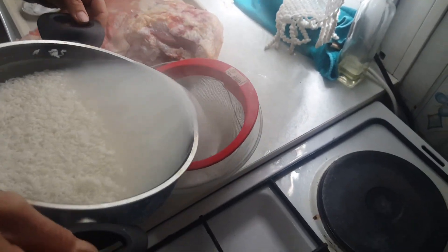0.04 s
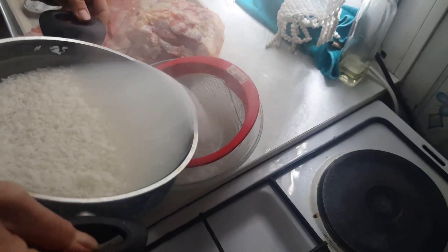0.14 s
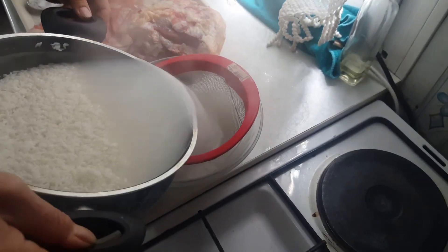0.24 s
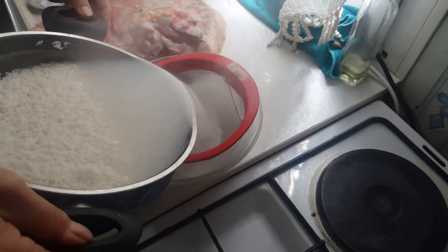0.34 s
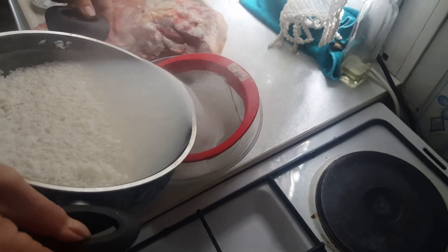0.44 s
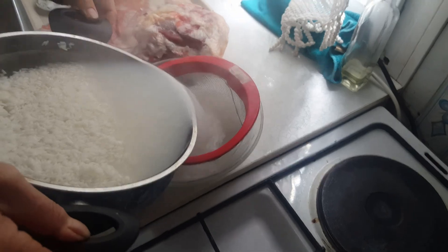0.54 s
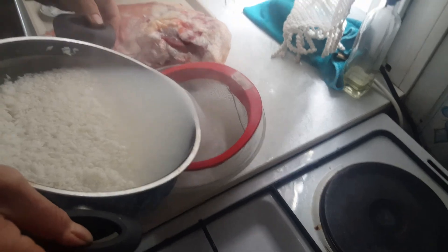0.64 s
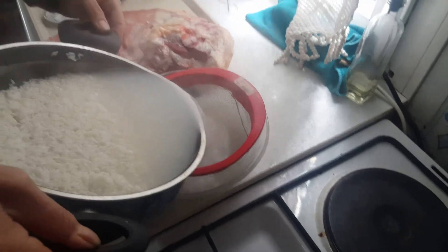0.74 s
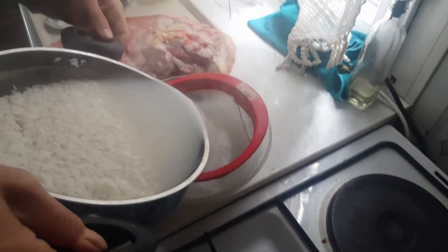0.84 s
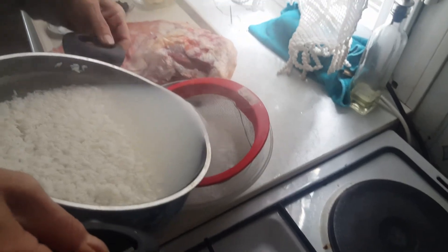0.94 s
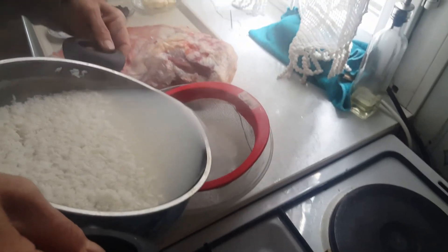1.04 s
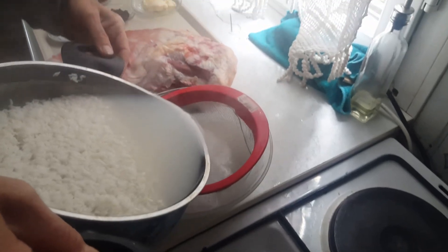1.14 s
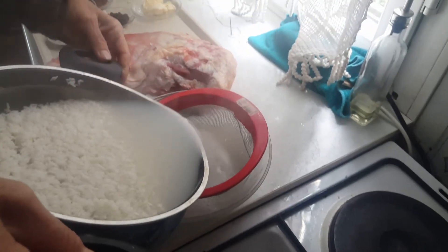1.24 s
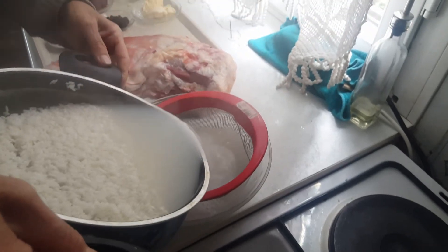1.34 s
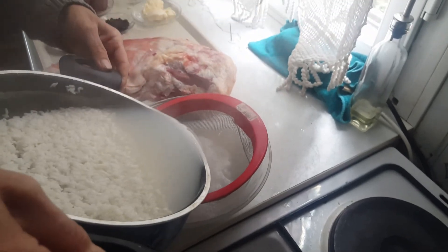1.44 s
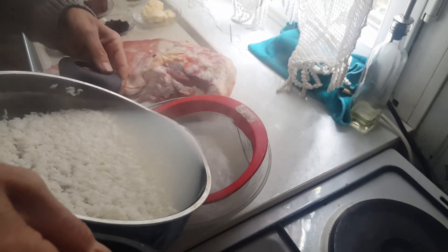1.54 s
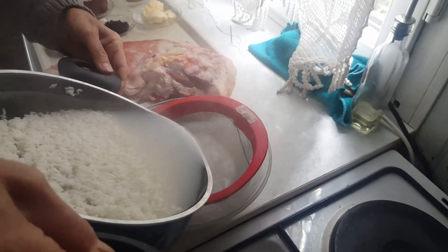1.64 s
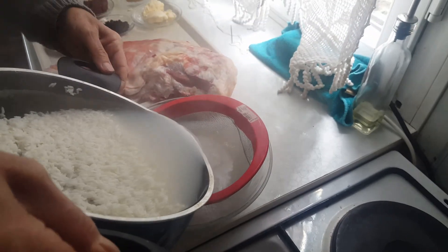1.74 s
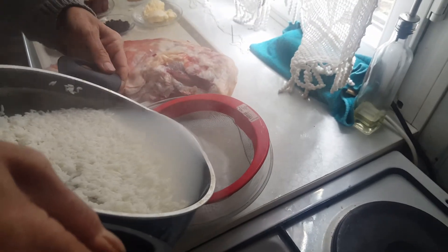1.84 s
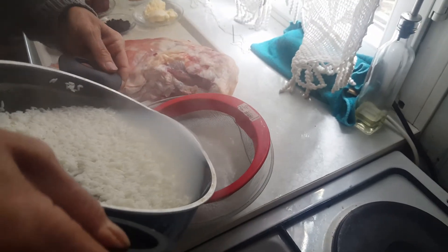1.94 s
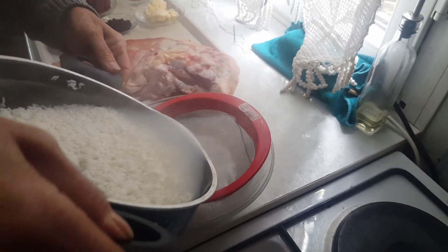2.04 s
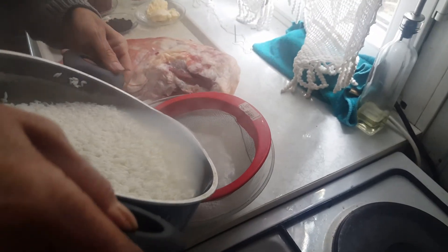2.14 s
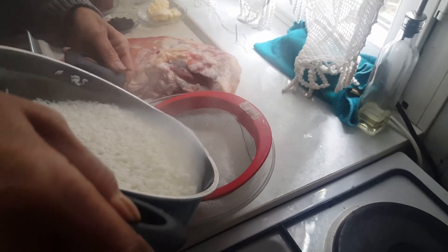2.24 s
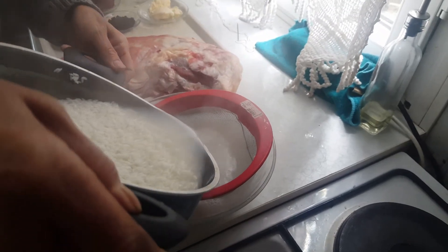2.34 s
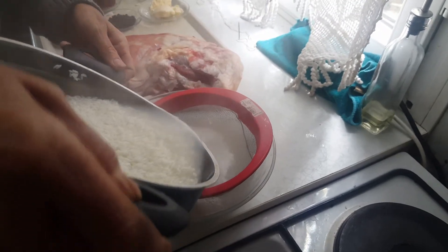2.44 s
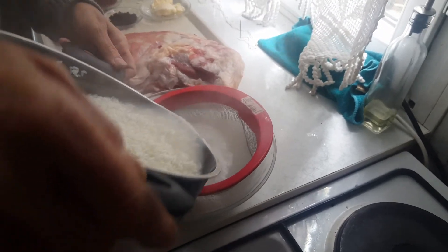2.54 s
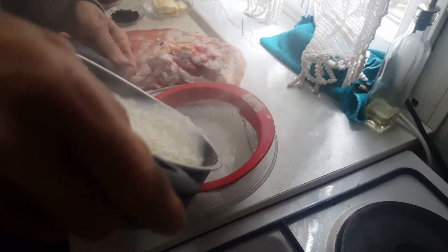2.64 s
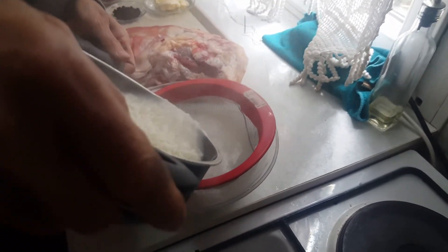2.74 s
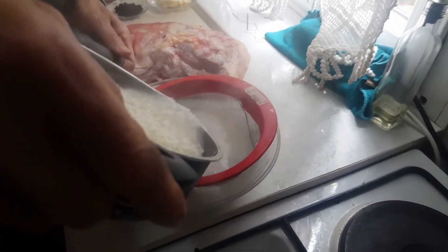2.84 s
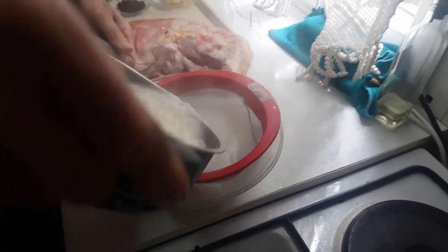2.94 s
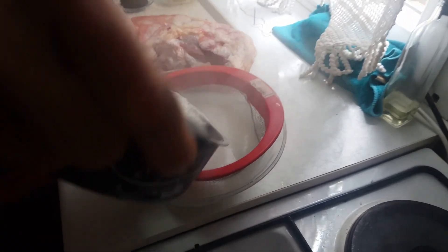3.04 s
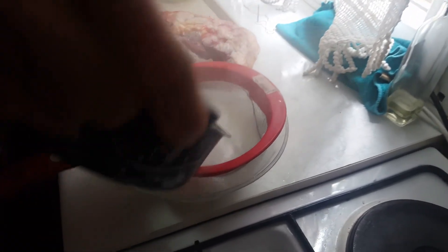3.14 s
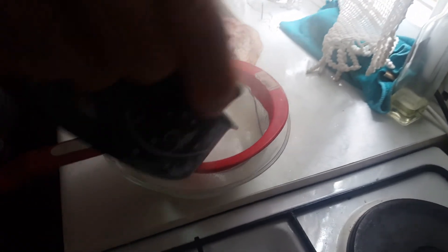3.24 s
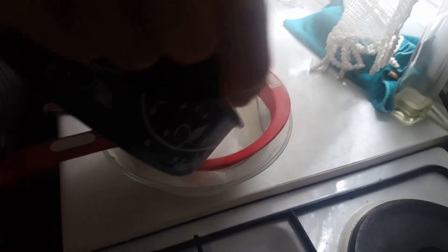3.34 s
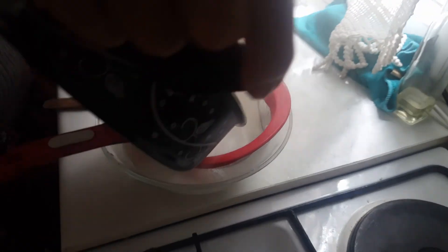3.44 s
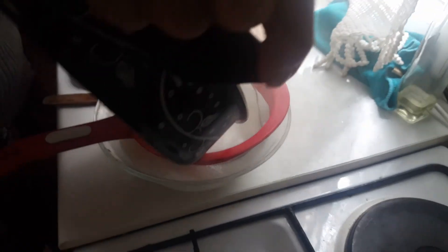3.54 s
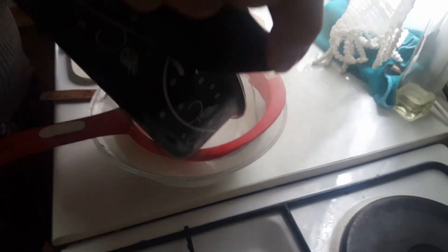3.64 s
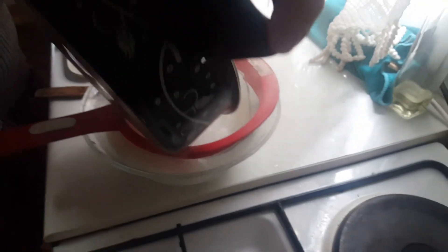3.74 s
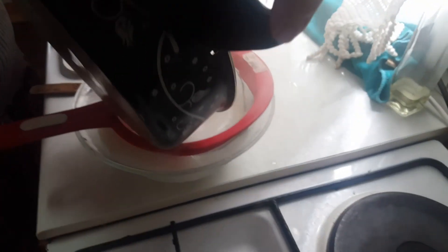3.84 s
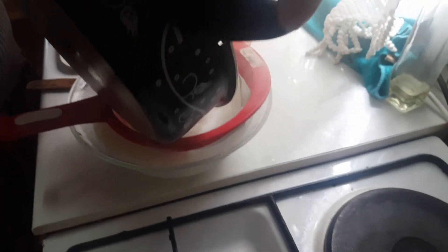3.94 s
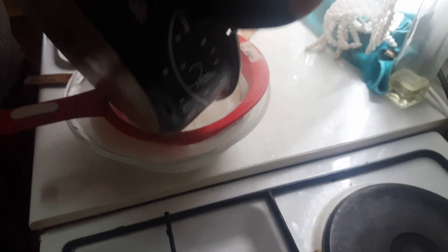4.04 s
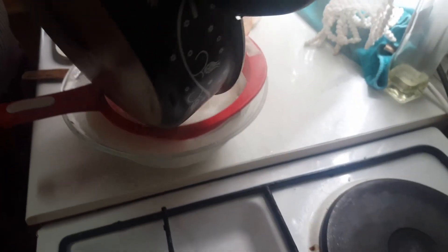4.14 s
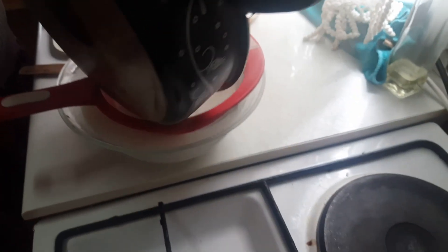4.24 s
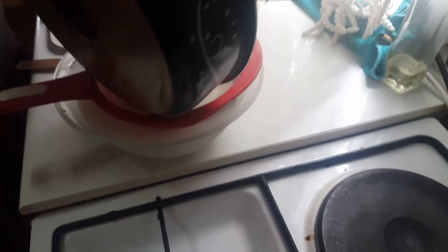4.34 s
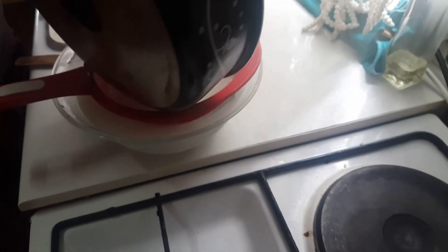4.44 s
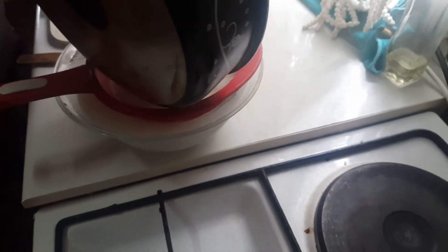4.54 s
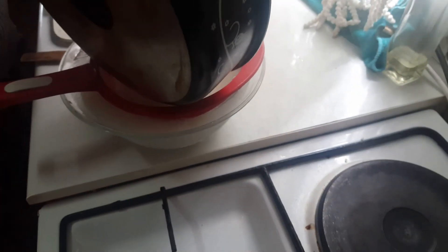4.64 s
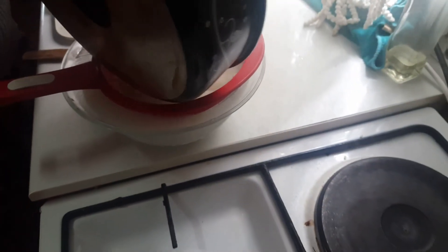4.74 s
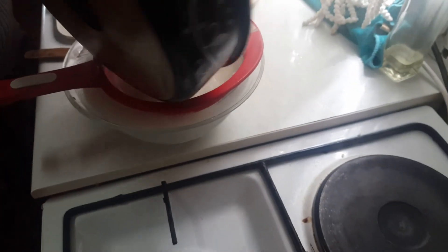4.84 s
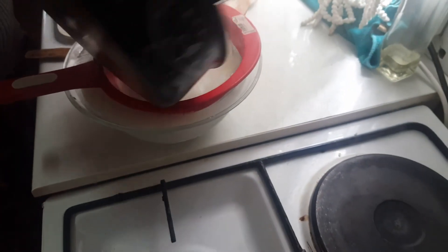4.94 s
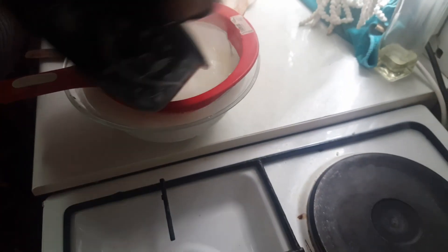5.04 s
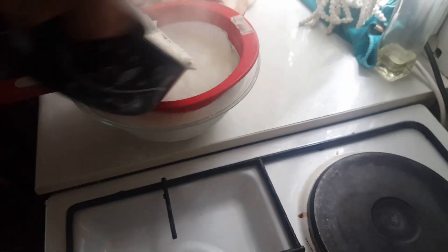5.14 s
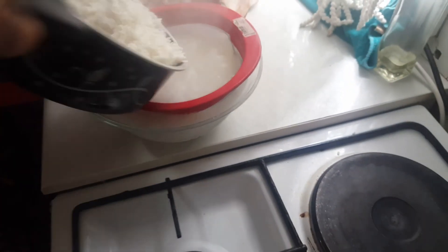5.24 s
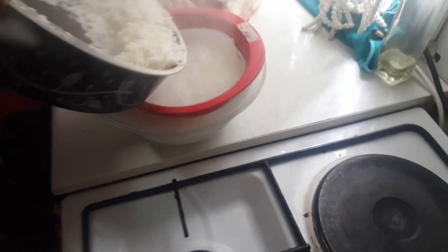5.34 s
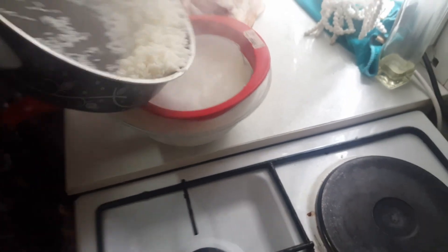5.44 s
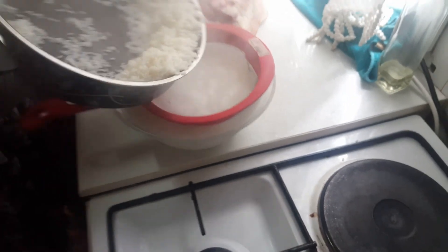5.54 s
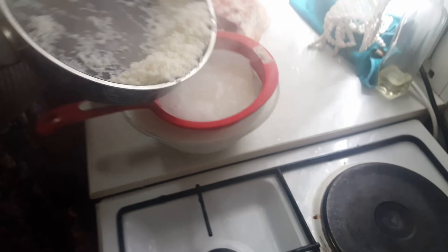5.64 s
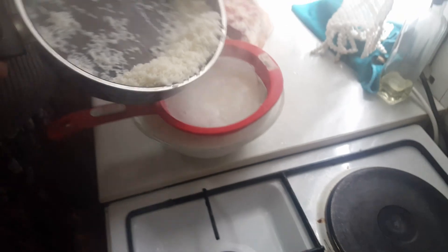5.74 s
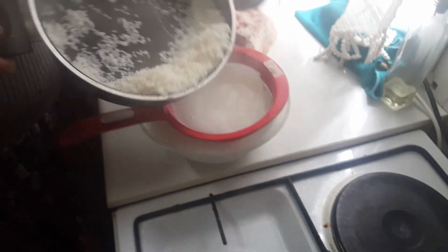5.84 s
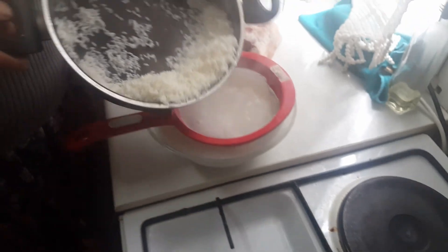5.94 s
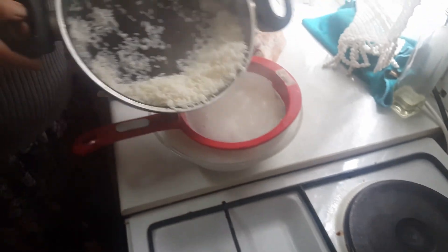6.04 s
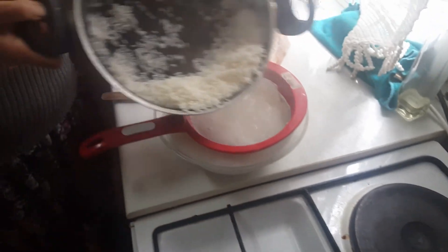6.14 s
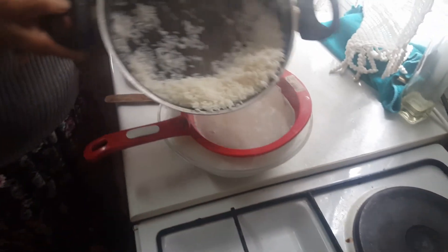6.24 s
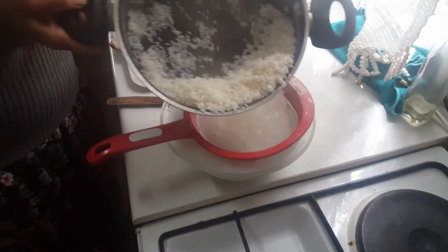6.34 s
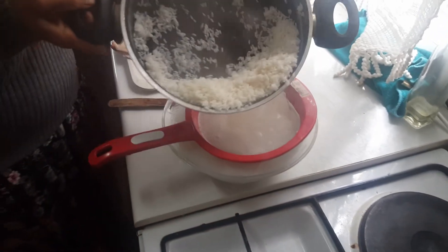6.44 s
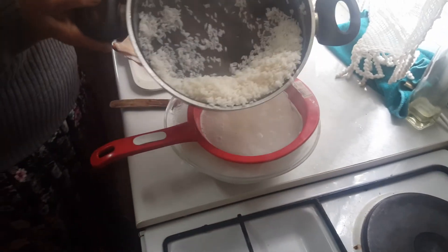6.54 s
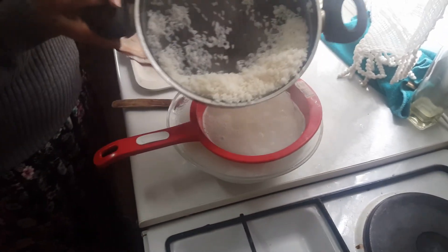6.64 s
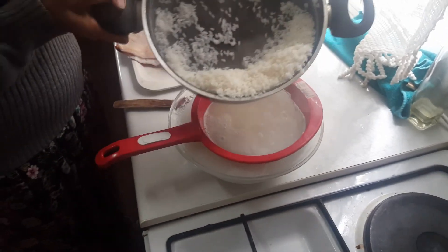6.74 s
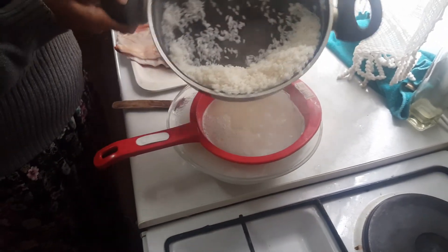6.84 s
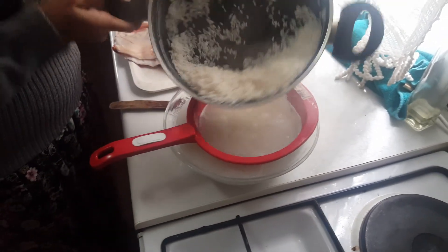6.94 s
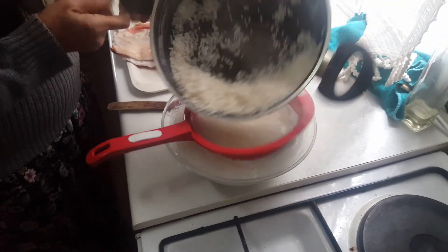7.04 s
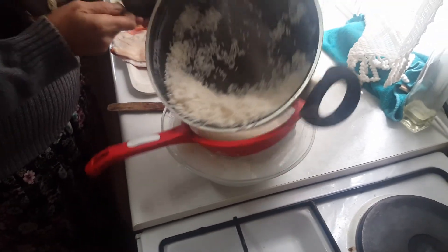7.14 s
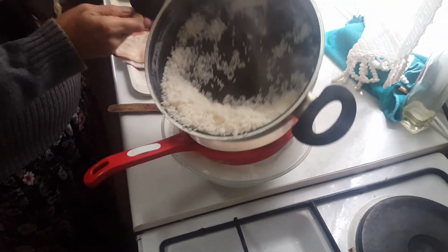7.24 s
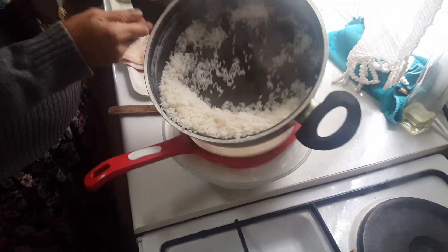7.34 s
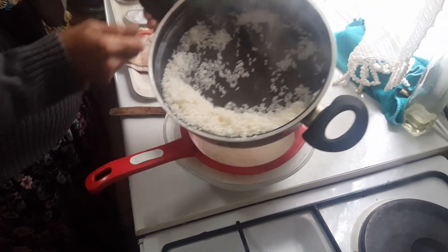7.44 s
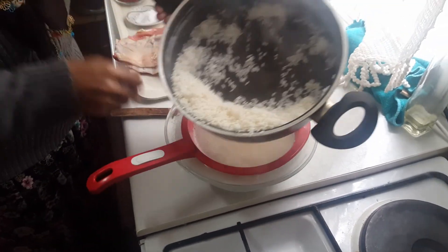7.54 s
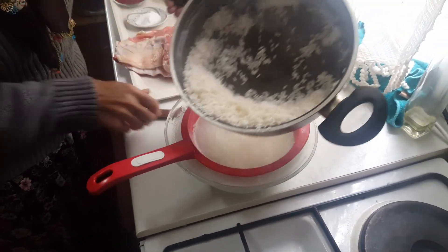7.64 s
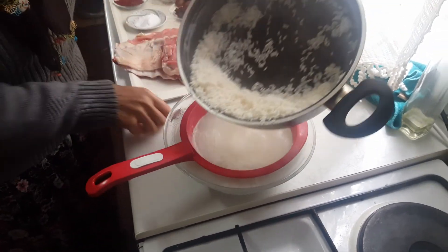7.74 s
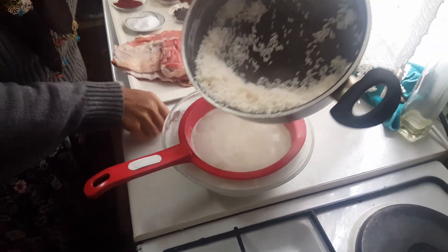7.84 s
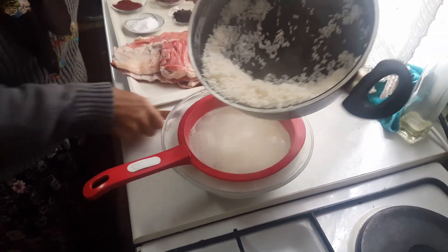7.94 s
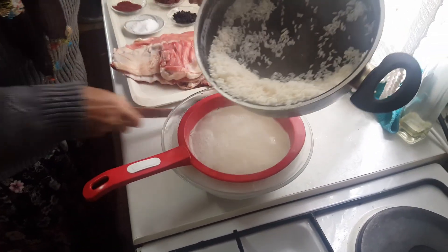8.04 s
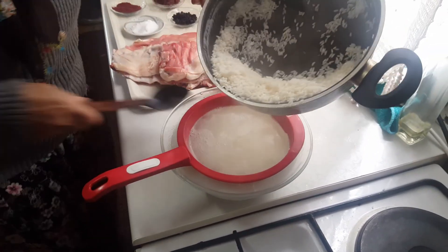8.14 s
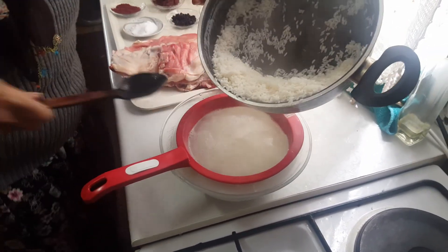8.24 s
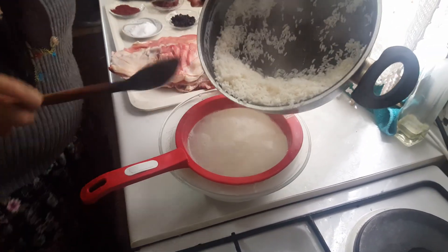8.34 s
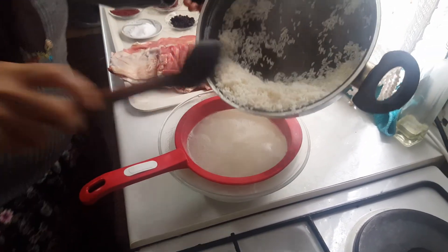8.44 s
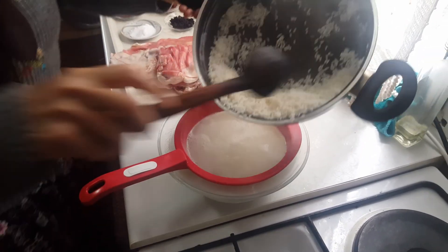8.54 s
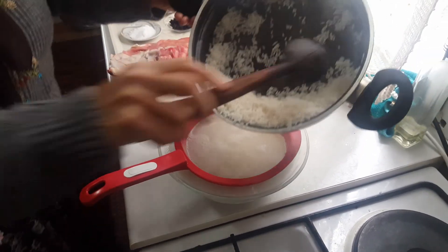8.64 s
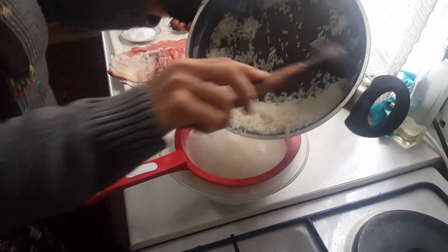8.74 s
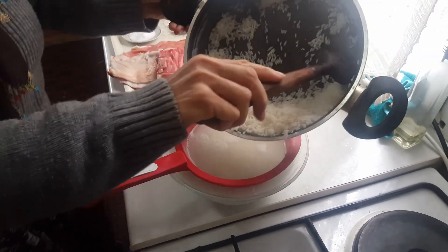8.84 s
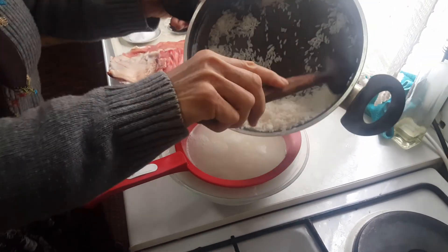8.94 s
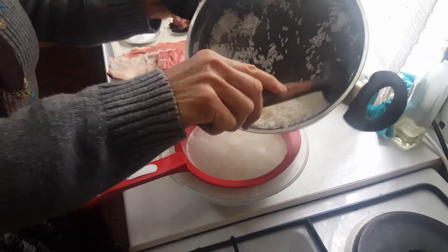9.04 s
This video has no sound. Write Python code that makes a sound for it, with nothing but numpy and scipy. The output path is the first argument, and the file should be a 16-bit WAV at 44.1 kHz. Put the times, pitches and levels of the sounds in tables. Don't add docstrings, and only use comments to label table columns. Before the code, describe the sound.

Wet gobs and drips patter into a bowl, growing heavier with rice, then hard counter knocks, cloth shuffles and a damped spoon hit on metal.

```python
import sys
import numpy as np
from scipy import signal
from scipy.fft import rfft, irfft, next_fast_len
from scipy.io import wavfile
from scipy.ndimage import uniform_filter1d

SR = 44100
rng = np.random.default_rng(int(sys.argv[2]) if len(sys.argv) > 2 else 0)


def int16_out(signal):
    q = np.round(np.clip(np.atleast_2d(signal).T, -1, 1) * 32767)
    wavfile.write(sys.argv[1], SR, q.astype(np.int16))


def natural_amplitude(level_db):
    exponent = np.asarray(level_db, float) / 20
    return 10 ** exponent


N = 400428

# freq_hz, density_db
HUSH_SPECTRUM = [(30, -14), (70, -14), (204, -14.5), (305, -7.5), (400, -23), (700, -23.5), (3250, -27.5),
                 (3930, -34), (16000, -52)]
# freq_hz, width_hz, level_db
WHINE_TONES = [(301, 11, -78.5), (2920, 52, -80.5), (2050, 50, -89), (430, 65, -76)]
# freq_hz, likeness_0_1
HUSH_LIKENESS = [(30, 0.79), (150, 0.03), (600, 0.04), (2000, 0.022), (6000, 0.15)]
# freq_hz, t60_s
ROOM_DECAY = [(100, 0.79), (400, 0.32), (1500, 0.25), (4000, 0.11), (12000, 0.089)]
# freq_hz, left_right_db
PORT_BALANCE = [(60, -.6), (400, -2.6), (1500, -3.4), (8000, -2.2), (12500, -5.5)]
PORT_EDGE_HZ = 15800

# start_s, shuffle_db, rustle_db
HAND_MOVES = [(5.5, -73, -88), (5.63, -56, -76), (5.68, -60.5, -78), (5.98, -62, -63.5),
              (6.3, -62.5, -74.5), (6.78, -68, -72), (6.83, -59.5, -68.5), (7.06, -52, -62),
              (7.35, -51.5, -66), (7.62, -58.5, -68.5), (8.76, -81, -73), (9.08, -63, -68)]
# freq_hz, density_db
CLOTH_SPECTRUM = [(200, 12), (420, 17.5), (1000, 2), (2500, 7), (4000, -2.5), (6000, -65)]

# start_s, peak_db, pitch_hz
COUNTER_THUMPS = [(1.557, -52.5, 158), (4.225, -43.5, 139), (5.035, -38, 152), (6.0078, -28.5, 170),
                  (6.088, -37.5, 167), (7.014, -39, 148), (7.136, -39.5, 140), (7.235, -42.5, 109),
                  (7.286, -36, 86), (7.489, -43, 138), (7.807, -46.5, 201)]
# freq_hz, level_db, t60_s
COUNTER_MODES = [(84.3, -14.5, 0.73), (109.7, -4, 0.2), (140, -2.5, 0.11), (180.5, -10, 0.43),
                 (252, 7, 0.0095)]

# start_s, crack_db, crack_hz, body_hz, body_db
COUNTER_KNOCKS = [(5.019, -42, 2400, 1750, -39), (5.0338, -20, 2440, 800, -40),
                  (5.244, -53, 2350, 383, -51.5), (5.435, -43.5, 2360, 424, -51.5),
                  (6.008, -35, 2400, 890, -46), (6.0122, -22.5, 2400, 407, -46),
                  (6.0879, -35, 1920, 483, -45.5), (7.0123, -26, 2400, 790, -33),
                  (7.1404, -22, 3220, 1020, -46.5), (7.1941, -62, 2770, 1370, -47.5),
                  (7.235, -25, 2400, 402, -50), (7.2822, -32.5, 2370, 990, -50.5),
                  (7.481, -40.5, 2240, 770, -52.5), (7.7966, -48, 2920, 450, -57),
                  (7.9619, -53, 2950, 560, -46)]
# start_s, crack_db, crack_hz, body_hz, body_db
SPOON_TAPS = [
    (7.8177, -39, 2810, 607, -39),
    (8.8095, -60, 2180, 780, -40),
    (8.8118, -29.5, 2060, 414, -50.5),
    (8.973, -49, 2520, 810, -57),
]
# freq_ratio, width_ratio, level_db
CRACK_SHAPE = [(.73, 0.35, 10.5), (1.0, 0.26, 19), (1.16, 0.31, 15.5), (1.55, 0.33, 9)]
# freq_ratio, width_ratio, level_db
BODY_SHAPE = [(.55, 0.22, -3), (1.0, 0.26, 2), (1.45, 0.3, -2), (2.1, .3, -4.5)]
BLOW_DELAY_S = 0.0012
KNOCK_TICK_DB, TAP_TICK_DB, TICK_SHARE = -22, -11, 0.74
KNOCK_TOP_HZ = 7000

# start_s, peak_db, left_right_db
SPOON_RAPS = [
    (8.8629, -8, 4),
]
# freq_hz, level_db, t60_s
POT_MODES = [(200, -18.5, 0.12), (337, -2, 0.033), (430, 0.5, 0.06), (630, -5.5, 0.047), (751, 8, 0.022),
             (849, 1, 0.057), (1120, 9, 0.0078), (1365, 5.5, 0.016), (1750, 2, 0.032), (2360, -13, 0.049),
             (3280, -14.5, 0.032), (5780, -21, 0.029)]
# freq_hz, level_db, t60_s
SHIVER_MODES = [(320, -6, 0.46), (413, -0.5, 0.52), (581, -14, .28), (790, -16, 0.43), (970, -2, .2),
                (1260, -1, .22)]
SHIVER_DB, SHIVER_WIDTH_HZ = -28, 32

# freq_hz, width_hz, level_db
BOWL_MODES = [(587, 270, 0.5), (844, 140, 1.5), (1413, 140, 4.5)]
# freq_hz, width_hz, level_db
SIEVE_MODES = [(2400, 470, 12.5), (2850, 520, 17.5), (3280, 220, 15), (3660, 220, 6.5), (4600, 620, -16)]
# freq_hz, density_db
SPRAY_SPECTRUM = [(2650, -5.5), (4500, -4.5), (4950, -5.5), (6250, -4.5), (8740, -3), (10900, -10),
                  (15200, -3.5), (16000, -17)]
# start_s, flow_db, fineness_0_1 (fat gobs to fine spray)
POUR_FLOW = [(0, -59, 0.29), (1.4, -64, 0.3), (1.7, -65, 0.32), (2.3, -64, 0.25), (2.85, -59.5, 0.2),
             (4.13, -61.5, 0.33), (4.66, -59.5, 0.43), (4.8, -65, 0.66), (4.97, -56, 0.44),
             (5.12, -62, 0.37), (5.62, -82.5, 0.58), (5.65, -77, 0.69), (5.93, -76.5, 0.54)]
# start_s, pitch_hz
AIR_GAP_TONE = [(0, 3620), (.44, 3870), (.46, 2820), (2.2, 2850), (3.2, 2986), (4.8, 3400), (5.6, 2940)]
# begins_s, full_s, thins_s, over_s
RICE_BOOM_S = (2.55, 2.8, 4.35, 4.6)
BOOM_HZ, BOOM_WIDTH_HZ = 140, 56.18
BOOM_DB, RICE_BOOM_DB = -8.5, 6
GURGLE_DB, GURGLE_LOSS_DB = 5.5, -27
FIZZ_DB, FIZZ_GAIN_DB = -7.5, 24

# start_s, peak_db, pitch_hz
SIEVE_DRIPS = [(0.2084, -43, 3690), (0.227, -40, 3640), (0.246, -36.5, 3660), (0.5644, -47, 2500),
               (0.7428, -43, 3670), (0.9203, -49, 3760), (0.9777, -49, 2580), (1.05, -45, 2590),
               (1.296, -46.5, 2600), (1.5773, -46, 2770), (1.627, -46, 2730), (1.6477, -41.5, 2680),
               (2.493, -44, 3160), (2.5187, -37, 3130), (2.5755, -48, 3020), (2.592, -42, 3140),
               (2.6767, -38, 3660), (2.706, -38, 3070), (2.7233, -42, 3070), (2.746, -37, 3320),
               (1.124, -48.5, 3350), (2.882, -40, 3030), (2.9138, -37, 3390), (2.9553, -35, 3150),
               (3, -37, 2650), (3.0653, -32, 3420), (3.125, -37.5, 2980), (0.873, -46, 3300),
               (3.4113, -33, 2920), (3.5523, -43, 2740), (3.6376, -43, 2700), (3.756, -45, 3020),
               (3.9185, -43, 3430), (3.9185, -34, 3140), (4.008, -43, 3100), (4.021, -40, 3100),
               (4.079, -40, 3170), (4.1036, -41, 3150), (4.117, -32, 3230), (4.138, -36.5, 3270),
               (4.219, -44, 2340), (4.2198, -38, 3280), (4.2517, -40, 3260), (4.2882, -37, 3360),
               (4.3256, -41, 3360), (4.448, -42, 3370), (4.487, -45, 3400), (5.13, -50, 2775),
               (4.6618, -35, 3430), (4.6833, -37, 3420), (4.717, -39, 3300), (4.7336, -29.5, 3160),
               (4.768, -33, 3400), (4.998, -39, 3550)]
# start_s, peak_db, pitch_hz
AIR_POPS = [(0.04, -51, 437), (0.041, -33, 594), (0.253, -45.5, 560), (0.309, -50, 575), (2.006, -46, 1510),
            (0.635, -46, 582), (0.672, -43.5, 1100), (0.736, -41, 540), (0.8, -45, 565), (0.833, -45, 624),
            (0.98, -35, 1680), (1.11, -40, 582), (1.628, -44, 590), (1.453, -47, 606), (1.565, -37, 1500),
            (1.578, -51, 590), (1.982, -47.5, 620), (2.109, -46.5, 640), (2.407, -46.5, 560),
            (2.592, -53, 610), (2.688, -40.5, 1120), (2.825, -43, 544), (2.875, -36, 582),
            (2.912, -41, 915), (2.955, -36.5, 560), (2.005, -50, 610), (2.999, -34, 1010),
            (3.064, -53, 865), (3.191, -38, 915), (3.255, -36, 1190), (3.299, -44, 455), (3.365, -39, 1450),
            (3.446, -41, 1400), (3.473, -41, 1460), (3.6, -41, 1450), (3.612, -34, 1580), (3.638, -50, 560),
            (3.714, -49, 479), (4.865, -44, 1584), (1.778, -48, 640), (3.917, -38, 565), (4.018, -39, 515),
            (4.08, -48, 456), (4.08, -31, 1346), (4.139, -39, 1260), (4.21, -48, 577), (4.227, -40, 440),
            (4.251, -42, 550), (1.546, -46, 570), (4.349, -33, 1290), (4.464, -48, 630), (4.48, -35, 1180),
            (4.66, -46, 660), (4.645, -33, 1730), (4.66, -29, 1490), (4.733, -43, 1784), (4.734, -36, 1180),
            (4.786, -34, 1720), (4.997, -38, 1620), (5.019, -27.5, 1720)]
# start_s, peak_db, pitch_hz, t60_s
BRIEF_RINGS = [(.027, -43, 585, 0.13), (4.529, -48, 1310, .03), (7.817, -48, 5070, 0.016),
               (5.04, -37.5, 820, 0.077), (5.437, -51.5, 1413, 0.074), (6.0125, -20, 2750, 0.02),
               (6.013, -26.5, 2080, 0.04), (6.014, -24, 2400, 0.03), (6.014, -35, 2300, 0.11),
               (6.01, -31, 403, 0.036), (5.035, -33, 4800, .012), (5.037, -27.5, 1750, 0.019),
               (6.092, -42, 430, .15), (6.13, -56, 870, 0.066), (6.243, -52, 885, 0.038),
               (7.016, -40, 424, 0.16), (7.82, -37, 430, .1), (6.795, -51, 430, 0.088),
               (6.812, -60.5, 880, 0.31), (6.85, -63, 2010, 0.4), (7.013, -40, 3400, 0.016),
               (7.143, -46, 1014, 0.16), (7.142, -30, 3760, 0.015), (7.238, -44, 990, 0.24),
               (7.255, -54, 3690, 0.23), (7.949, -53, 620, 0.047)]
RING_BLUR = 0.08
DRIP_DB, POP_DB, BLIP_RISE_PER_S = -4.5, -7, 1.5
DRIP_CYCLES, POP_CYCLES = 9, 2.6

# start_s, slap_db, rattle_db, spray_db
WATER_MIDDLE = [(0.004, -45, -55.5, -82), (0.04, -51, -67, -53), (0.179, -62, -52, -54.5),
                (0.207, -49, -65, -76), (0.224, -53, -64, -53.5), (0.253, -64, -73, -55.5),
                (0.488, -45, -54.5, -66), (0.634, -51, -73, -63), (0.682, -51, -68, -53),
                (0.736, -49.5, -55.5, -56), (0.831, -39, -71, -45), (0.902, -46.5, -79, -53),
                (1.05, -43.5, -50.5, -59), (1.11, -46, -64, -83), (1.235, -34.5, -55, -52),
                (1.291, -64, -59, -58), (1.346, -54, -62, -53), (1.453, -49, -60, -71),
                (1.576, -40.5, -57, -101), (1.982, -59, -63, -63.5), (1.198, -66, -62, -57)]
# start_s, slap_db, rattle_db, spray_db
RICE_MIDDLE = [(2.408, -47, -59.5, -92), (2.488, -54, -50.5, -84), (2.59, -47, -56, -82),
               (2.824, -42.5, -54, -48), (2.876, -36.5, -43.5, -44.5), (2.956, -60, -57, -45.5),
               (3.122, -66, -53, -43), (3.297, -56, -59, -67), (3.506, -58, -66, -48.5),
               (3.637, -35.5, -53.5, -49.5), (3.714, -48, -76, -49), (3.825, -39, -46, -57),
               (3.846, -30.5, -49, -50), (3.917, -38, -54, -41), (4.018, -37.5, -45.5, -43.5),
               (4.226, -37, -49, -52), (4.25, -39, -61, -50.5), (4.287, -37, -71, -54),
               (4.448, -73, -63, -49)]
# start_s, slap_db, rattle_db, spray_db
GOBS_OFF_CENTRE = [(0.309, -46, -84, -67), (0.336, -78, -91, -55), (0.575, -48.5, -55, -87),
                   (2.912, -42, -46, -58), (2.999, -31.5, -48, -43.5), (3.031, -53, -65, -52),
                   (3.065, -31, -66, -52), (3.191, -38, -61, -59), (3.413, -45, -43, -44)]
# start_s, slap_db, rattle_db, spray_db
GOBS_NEAR_WALL = [(0.92, -51, -62, -54.5), (0.802, -62, -70, -61), (2.687, -48, -53, -49),
                  (2.724, -48, -50.5, -78), (3.254, -42.5, -78, -46), (4.08, -41.5, -47, -46.5),
                  (4.102, -62, -57, -72), (4.137, -59, -65, -51), (4.348, -40.5, -74, -53.5),
                  (4.478, -44, -54, -66), (4.488, -55, -42.5, -52), (4.682, -52, -58, -57),
                  (4.732, -58, -42, -37.5)]
# start_s, slap_db, rattle_db, spray_db
GOBS_ON_WALL = [(0.979, -40.5, -51, -61), (2.747, -55, -55.5, -64), (3.364, -43, -51, -47),
                (3.448, -38.5, -81, -58), (3.472, -39, -83, -71), (3.552, -61, -58, -45.5),
                (3.602, -49, -56, -53), (3.739, -43, -56.5, -61), (3.952, -49, -85, -77),
                (4.634, -53, -49, -52), (4.658, -38, -47, -55), (4.785, -44, -43, -45),
                (4.83, -51, -50, -48.5)]
PLACE_TONES = (575, 575, 920, 1230, 1470)
PLACE_SPREAD = 0.03
SLAP_DB, RATTLE_DB, SPRAY_DB = -1, 7, -1.5
SPLASH_S, SPLASH_SPREAD, RATTLE_SPREAD = 0.011, 0.58, 0.026
SPRAY_RISE_S = 0.004
SPRAY_LOW_HZ, SPRAY_HIGH_HZ, SPRAY_WIDTH_HZ = 4200, 12040, 2480


def seconds(count):
    return np.arange(count) / SR


def evened(x):
    return x / np.sqrt(np.mean(x ** 2) + 1e-20)


def peaked(x):
    return x / (abs(x).max() + 1e-12)


def read(points, hz):
    f, value = np.transpose(points)
    return np.interp(np.log(hz + 1), np.log(f + 1), value)


def controls(rows):
    s, *columns = np.transpose(rows)
    t = seconds(N)
    fade = np.interp(t, [s[0] - 0.1, s[0], s[-1], s[-1] + 0.12], [0, 1, 1, 0])
    return [np.interp(t, s, c) for c in columns], fade


def add(mix, s, sound, pan_db, lag=3):
    for side, (sign, late) in enumerate([(0.96, 0), (-1.02, lag)]):
        part = mix[side, max(round(s * SR) + late, 0):][:len(sound)]
        part += natural_amplitude(sign * pan_db / 2) * sound[:len(part)]


def resonate(x, hz, width_hz):
    r = np.exp(-np.pi * width_hz / SR)
    return 2 * signal.lfilter([1 - r], [1, -r * np.exp(2j * np.pi * hz / SR)], x).real


def resonate_twice(x, hz, width_hz):
    return resonate(resonate(x, hz, width_hz), hz, width_hz)


def glide(x, hz, width_hz):
    turn = np.exp(2j * np.pi * np.cumsum(hz) / SR)
    r = np.exp(-np.pi * width_hz / SR)
    return 2 * (turn * signal.lfilter([1 - r], [1, -r], x / turn)).real


def colour(x, points):
    count = x.shape[-1]
    size = next_fast_len(count)
    gain = natural_amplitude(read(points, np.fft.rfftfreq(size, 1 / SR)))
    return irfft(rfft(x, size) * gain, size)[..., :count]


def ring(modes, t, rise_s):
    hz, db, t60_s = np.transpose(modes)[:, :, None]
    tones = natural_amplitude(db - 60 * t / t60_s) * np.sin(2 * np.pi * hz * t)
    return tones.sum(0) * (1 - np.exp(-t / rise_s))


def ragged(noise, depth_db):
    return natural_amplitude(depth_db * evened(uniform_filter1d(noise, 60)))


def droplets(per_s, spread_db, drop_s, smooth):
    size = natural_amplitude(spread_db * np.minimum(rng.exponential(1, N), 4))
    hits = size * (rng.random(N) < per_s / SR)
    puffs = evened(signal.oaconvolve(hits, np.hanning(int(drop_s * SR) + 3))[:N])
    shared, own = rng.standard_normal(N), rng.standard_normal((2, N))
    return (puffs + smooth) * (np.array([shared, np.roll(shared, 4)]) + 2.4 * own)


def air():
    frames, hz = N // 256 + 5, np.fft.rfftfreq(1024, 1 / SR)
    a, b, c, d, patches = rng.standard_normal((frames, 513, 5)).T
    patches = evened(uniform_filter1d(uniform_filter1d(patches, 12, 0), 14, 1))
    same = np.clip(read(HUSH_LIKENESS, hz), -1, 1)[:, None]
    left = a + 1j * b
    right = same * left + np.sqrt(1 - same ** 2) * (c + 1j * d)
    z = np.array([left, right]) * natural_amplitude(1.8 * patches)
    hush = colour(signal.istft(z, nperseg=1024, noverlap=768)[1][:, :N], HUSH_SPECTRUM)
    stir = rng.standard_normal(N) + 0.5 * rng.standard_normal((2, N))
    whine = sum(natural_amplitude(db) * evened(resonate_twice(stir, f, w)) for f, w, db in WHINE_TONES)
    return natural_amplitude(-64.5) * evened(hush) + whine


def kitchen(x):
    taps = np.zeros((2, SR // 2))
    slots = np.arange(130, SR // 2 - 20, 20)
    at = slots + rng.integers(0, 20, (2, len(slots)))
    np.put_along_axis(taps, at, rng.choice([-1., 1.], at.shape), 1)
    hz, t, z = signal.stft(taps, SR, nperseg=256)
    decay = natural_amplitude(-60 * t / read(ROOM_DECAY, hz)[:, None])
    tail = signal.istft(z * decay, SR, nperseg=256)[1]
    return signal.fftconvolve(x.mean(0)[None], tail / np.linalg.norm(tail[0]), axes=1)[:, :N]


def hands():
    (shuffle_db, rustle_db), fade = controls(HAND_MOVES)
    moves = droplets(49, 3.5, 0.021, 2.8)
    shuffle = natural_amplitude(shuffle_db - 7) * evened(colour(moves, CLOTH_SPECTRUM))
    rustle = natural_amplitude(rustle_db - 3.5) * evened(colour(moves, SPRAY_SPECTRUM))
    return fade * (shuffle + rustle)


def thumps():
    out, t = np.zeros((2, N)), seconds(SR // 2)
    for s, db, hz in COUNTER_THUMPS:
        moods = rng.standard_normal(len(COUNTER_MODES))
        modes = [(f, level_db + m, t60_s) for (f, level_db, t60_s), m in zip(COUNTER_MODES, moods)]
        boom = ring(modes + [(hz, 4, 0.1)], t, 0.0054)
        mutter = rng.standard_normal(len(t)) * (1 - np.exp(-t / 0.0091)) * np.exp(-t / 0.069)
        mutter = resonate_twice(mutter, 0.96 * hz, 83)
        add(out, s, natural_amplitude(db) * (0.46 * peaked(mutter) - peaked(boom)), 0, lag=0)
    return out


def struck(noise, t, hz, shape, chatter, chatter_s):
    push = (t == 0) + chatter * noise * (np.exp(-t / chatter_s) + 0.25 * np.exp(-t / 0.0073))
    tone = np.zeros(len(t))
    for i, (ratio, width, db) in enumerate(shape):
        mode = resonate(resonate(push, ratio * hz, width * hz), ratio * hz, 2.5 * hz)
        tone += (-1) ** i * natural_amplitude(db) * mode
    return peaked(tone)


def knocks():
    out, t = np.zeros((2, N)), seconds(5000)
    for rows, tick_db in ((COUNTER_KNOCKS, KNOCK_TICK_DB), (SPOON_TAPS, TAP_TICK_DB)):
        for s, crack_db, crack_hz, body_hz, body_db in rows:
            noise = rng.standard_normal((3, len(t)))
            crack = natural_amplitude(crack_db) * struck(noise[0], t, crack_hz, CRACK_SHAPE, 0.14, 0.002)
            body = natural_amplitude(body_db + 7.5) * struck(noise[1], t, body_hz, BODY_SHAPE, 0.063, 0.013)
            tick = resonate(resonate(noise[2] * np.exp(-t / 0.019), 2500, 1600), 8200, 1400)
            tick = natural_amplitude(tick_db + TICK_SHARE * crack_db) * peaked(tick)
            add(out, s + BLOW_DELAY_S / 2, crack + body + tick, 2)
    return signal.lfilter(*signal.butter(2, KNOCK_TOP_HZ, fs=SR), out)


def rap():
    out, t = np.zeros((2, N)), seconds(SR // 2)
    for s, db, pan_db in SPOON_RAPS:
        stir = rng.standard_normal(len(t)) * (1 - np.exp(-t / 0.0018))
        blur, after = np.zeros(len(t)), np.zeros(len(t))
        for f, level_db, _ in POT_MODES:
            decay = np.exp(-t / 0.0039) + 0.04 * np.exp(-t * (f / 500) ** 0.6 / 0.12)
            blur += natural_amplitude(level_db) * resonate(resonate(stir, f, 0.25 * f), f, 0.32 * f) * decay
        for f, level_db, t60_s in SHIVER_MODES:
            mode = resonate(resonate(stir, f, SHIVER_WIDTH_HZ * f / 300), f, 0.2 * f)
            after += natural_amplitude(level_db - 60 * t / t60_s) * evened(mode)
        wall = ring(POT_MODES, t, 0.0017) * (0.26 + np.exp(-t / 0.0087))
        wall = signal.lfilter(*signal.butter(2, 200, "high", fs=SR), wall)
        sound = 0.24 * peaked(blur) - peaked(wall) + natural_amplitude(SHIVER_DB) * after
        add(out, s + BLOW_DELAY_S, natural_amplitude(db) * sound, pan_db + 1, lag=0)
    return np.array([np.roll(out[0], 4), out[1]])


def blips():
    out, t = np.zeros((2, N)), seconds(5000)
    rows = [(s, db + DRIP_DB, hz, DRIP_CYCLES / hz, BLIP_RISE_PER_S) for s, db, hz in SIEVE_DRIPS]
    rows += [(s, db + POP_DB, hz, POP_CYCLES / hz, BLIP_RISE_PER_S) for s, db, hz in AIR_POPS]
    rows += [(s, db, hz, t60_s / np.log(1000), 0) for s, db, hz, t60_s in BRIEF_RINGS]
    for s, db, hz, fade_s, rise in rows:
        mood = rng.standard_normal(2)
        wet = rise != 0
        if wet:
            fade_s = fade_s * np.exp(0.3 * mood[0])
        decay = np.exp(-t / fade_s)
        tone = np.sin(2 * np.pi * hz * t * (1 + rise * t)) * decay * (1 - np.exp(-t * hz / 1.3))
        sound = peaked(tone)
        if not wet:
            clatter = evened(resonate_twice(rng.standard_normal(len(t)), hz, RING_BLUR * hz))
            clatter = clatter * decay * np.minimum(t / 0.013, 1)
            sound = sound * np.exp(-t / 0.012) + 0.53 * clatter
        add(out, s, natural_amplitude(db) * sound, mood[1] + 0.5)
    return out


def landings():
    places = WATER_MIDDLE, RICE_MIDDLE, GOBS_OFF_CENTRE, GOBS_NEAR_WALL, GOBS_ON_WALL
    return [(s, slap_db, hz, rattle_db, spray_db)
            for rows, hz in zip(places, PLACE_TONES) for s, slap_db, rattle_db, spray_db in rows]


def surge(settle_s, calm, full_db, order):
    gobs = landings()
    hits = np.zeros(N)
    hits[[round(row[0] * SR) for row in gobs]] = natural_amplitude(np.transpose(gobs)[order] - full_db)
    settling = signal.lfilter([1], [1, -np.exp(-1 / (settle_s * SR))], hits)
    churn = signal.lfilter([0.006], [1, -0.994], settling)
    return evened(calm + np.tanh(churn))


def slosh(depth=0.14):
    heave = evened(uniform_filter1d(rng.standard_normal(N // 441 + 2), 5))
    return np.exp(depth * np.interp(np.arange(N) / 441, np.arange(len(heave)), heave))


def bubbles(low_hz, high_hz, per_s, cycles, count=14):
    out, t = np.zeros((2, N)), seconds(900)
    for hz in np.geomspace(low_hz, high_hz, count):
        tone = np.sin(2 * np.pi * hz * t * (1 + 8 * t))
        tone = tone * np.exp(-t * hz / cycles) * (1 - np.exp(-t * hz))
        events = rng.random((int(per_s * N / SR / count), 3))
        for s, size, side in events * [N / SR, 1, 1]:
            add(out, s, natural_amplitude(-2.6 * np.log(size + 0.011)) * tone, 8 * (side - 0.5))
    return evened(out)


def flow():
    (flow_db, fine), fade = controls(POUR_FLOW)
    (gap_hz,), _ = controls(AIR_GAP_TONE)
    gurgle_db = flow_db + GURGLE_DB + GURGLE_LOSS_DB * fine
    fizz_db = flow_db + FIZZ_DB + FIZZ_GAIN_DB * fine
    boom_db = flow_db + BOOM_DB + RICE_BOOM_DB * np.interp(seconds(N), RICE_BOOM_S, [0, 1, 1, 0])
    drops = droplets(260, 3.2, 0.005, 0.35)
    gurgle = sum(natural_amplitude(db) * glide(resonate(drops, f, 490), f * slosh(), w) for f, w, db in BOWL_MODES)
    gurgle = evened(gurgle) + 0.5 * bubbles(500, 2400, 300, 2.5)
    mesh = sum(natural_amplitude(db) * glide(resonate(drops, f, 1700), f * slosh(0.029), w + 150)
               for f, w, db in SIEVE_MODES)
    gap = glide(glide(drops, gap_hz, 69), gap_hz, 69)
    trickle = evened(mesh) + 0.37 * bubbles(1800, 3870, 320, 4.3) + 0.34 * evened(gap)
    fizz = evened(colour(droplets(740, 1.3, 0.012, 0.48), SPRAY_SPECTRUM))
    stir = rng.standard_normal(N) + 0.23 * rng.standard_normal((2, N))
    boom = evened(resonate_twice(stir, BOOM_HZ, BOOM_WIDTH_HZ))
    water = surge(0.03, 0.7, -48, order=1) * natural_amplitude(gurgle_db) * gurgle
    water += surge(0.035, 0.5, -54, order=3) * natural_amplitude(flow_db) * trickle
    water += surge(0.025, fine ** 1.5, -35, order=4) * natural_amplitude(fizz_db) * fizz
    water += surge(0.028, 0.31, -40, order=1) * natural_amplitude(boom_db) * boom
    return fade * water


def splashes():
    rattle, spray, t = np.zeros((2, N)), np.zeros((2, N)), seconds(1800)
    for s, _, _, rattle_db, spray_db in landings():
        noise, mood = rng.standard_normal((4, len(t))), rng.standard_normal(6)
        length_s = SPLASH_S * np.exp(SPLASH_SPREAD * mood[5]) + 0.002
        swell = ragged(noise[0], 3.6) * (1 - np.exp(-t / 0.001)) * np.exp(-(t / length_s) ** 2)

        push = (np.exp(-t / 0.0015) + swell) * noise[1]
        gap_hz = np.interp(s, *np.transpose(AIR_GAP_TONE)) * (1 + RATTLE_SPREAD * rng.standard_normal())
        mesh = sum(natural_amplitude(db + 3 * m) * resonate(push, f, w) for (f, w, db), m in zip(SIEVE_MODES, mood))
        tone = 4.7 * resonate(push, gap_hz, 190) + 0.23 * mesh
        add(rattle, s, natural_amplitude(rattle_db + RATTLE_DB) * peaked(tone), 0)

        swell = (swell + 0.11 * np.exp(-t / 0.015)) * (1 - np.exp(-t / SPRAY_RISE_S))
        swell += 0.85 * (mood[4] > 0) * np.exp(-t / 0.0013)
        drop_hz = rng.uniform(SPRAY_LOW_HZ, SPRAY_HIGH_HZ)
        hiss = 0.5 * noise[2:] + 2.2 * resonate(noise[2:], drop_hz, SPRAY_WIDTH_HZ)
        level_db = spray_db + SPRAY_DB
        add(spray, s, natural_amplitude(level_db) * swell * hiss[0], 0)
        for side in (-1, 1):
            add(spray, s, natural_amplitude(level_db - 6.5) * swell * hiss[1][::side], 20 * side)
    unit = np.sqrt(np.mean(natural_amplitude(read(SPRAY_SPECTRUM, np.linspace(1, SR / 2, 200))) ** 2))
    return rattle + natural_amplitude(-8) * colour(resonate(spray, 3000, 11400), SPRAY_SPECTRUM) / unit


def slaps():
    out, t = np.zeros((2, N)), seconds(2000)
    for s, db, hz, _, _ in landings():
        noise, mood = rng.standard_normal((2, len(t))), rng.standard_normal(6)
        sloshing = ragged(noise[1], 5) * np.exp(-t / 0.008) * noise[0]
        push = np.exp(-t / 0.0001) + 0.12 * sloshing
        modes = [(hz * (1 + PLACE_SPREAD * mood[5]), 170, 5), (2000, 1200, -12)]
        for (f, w, bowl_db), m in zip(BOWL_MODES, mood[::-1]):
            modes.append((f * (1 + 0.1 * m), w + 150, bowl_db + 5.5))
        tone = np.zeros(len(t))
        for (f, w, level_db), m in zip(modes, mood):
            tone += natural_amplitude(level_db + 2 * m) * resonate(resonate(push, f, w), f, 370) / np.sqrt(w)
        add(out, s, natural_amplitude(db + SLAP_DB) * peaked(tone), 0)
    return out


def scene():
    background = air() + hands()
    booms, hits, spoon = thumps(), knocks(), rap()
    drips, gobs = blips(), splashes() + slaps()
    send = natural_amplitude(-23.5) * booms + natural_amplitude(-9.5) * hits + natural_amplitude(-17) * spoon + natural_amplitude(-11.5) * drips + natural_amplitude(-6) * gobs
    return background + booms + hits + spoon + drips + flow() + gobs + kitchen(send)


def low_pass(x):
    return signal.sosfilt(signal.butter(12, 16660, fs=SR, output="sos"), x)


def record(dry):
    hz = np.linspace(0, SR / 2, 257)
    balance_db, passed = read(PORT_BALANCE, hz), hz < PORT_EDGE_HZ
    ports = [signal.firwin2(401, hz, natural_amplitude(sign * balance_db / 2) * passed, fs=SR) for sign in (1, -1)]
    dry = signal.lfilter(*signal.butter(2, 48, "high", fs=SR), dry)
    mix = signal.oaconvolve(dry, np.array(ports), "same", axes=1) - 0.0004
    return low_pass(mix)


dry = scene()
out = record(dry)
int16_out(out)
```